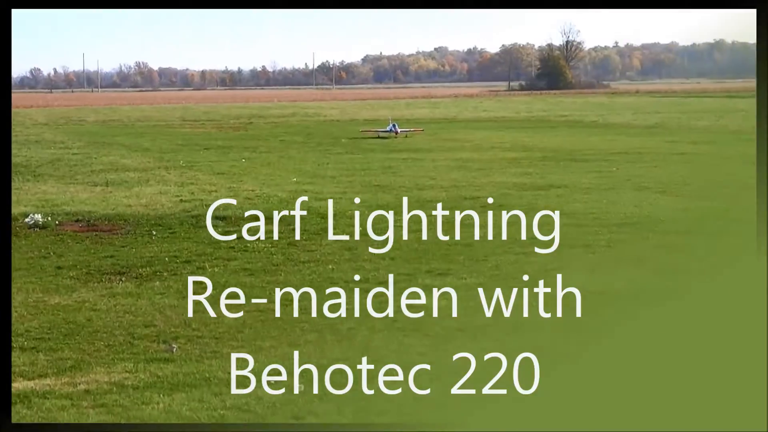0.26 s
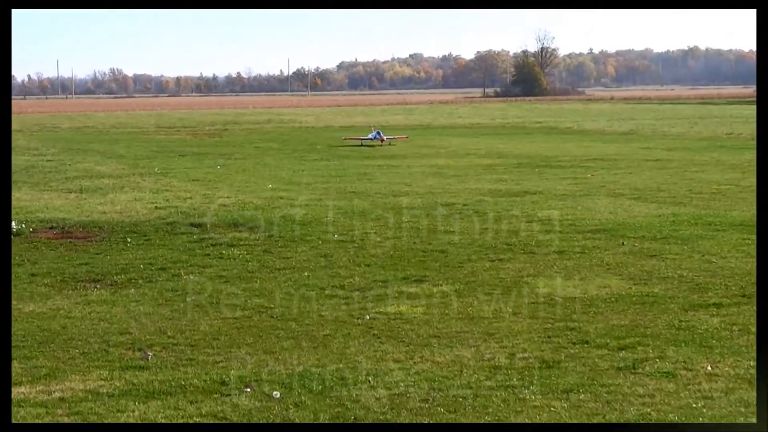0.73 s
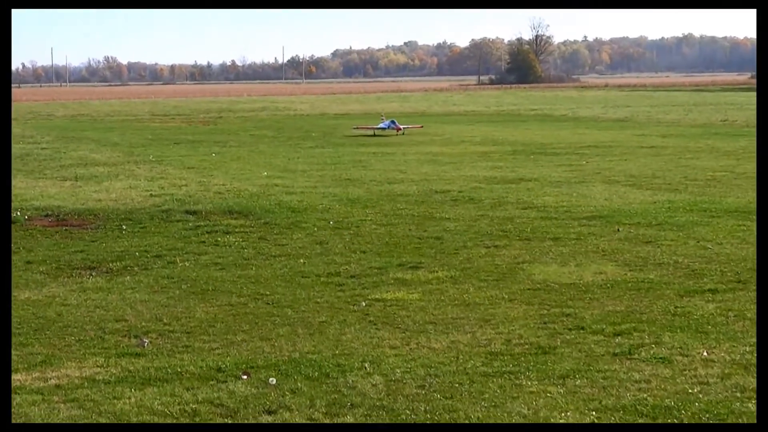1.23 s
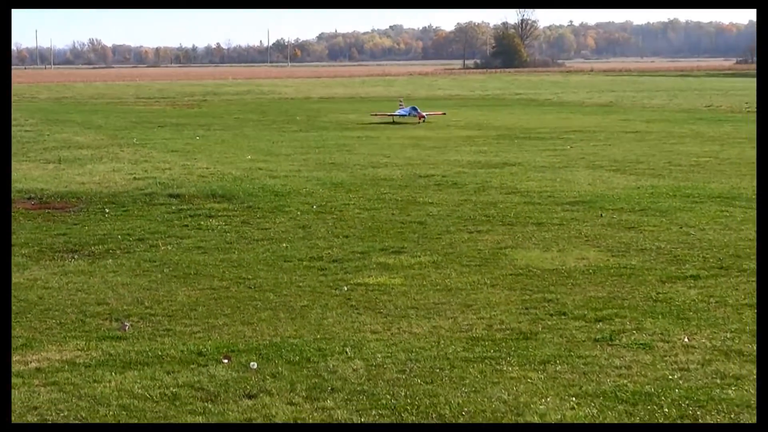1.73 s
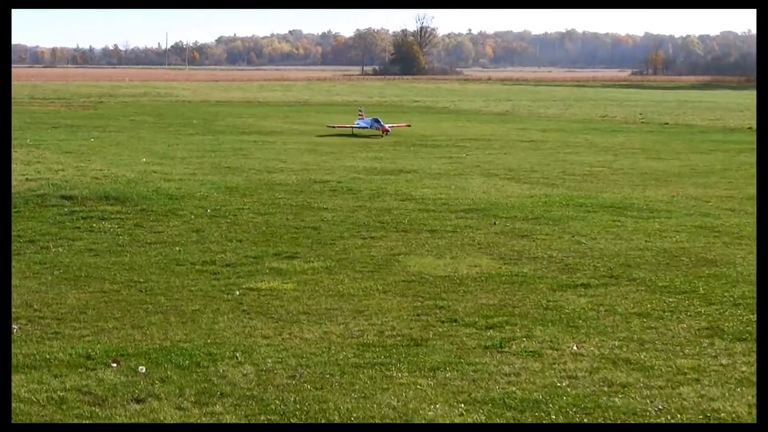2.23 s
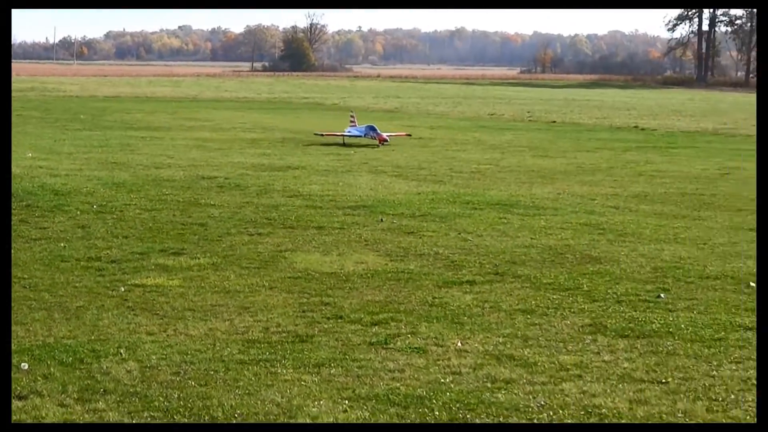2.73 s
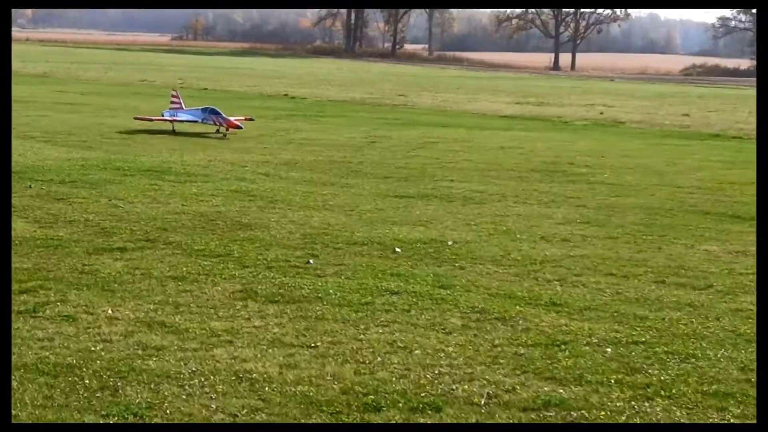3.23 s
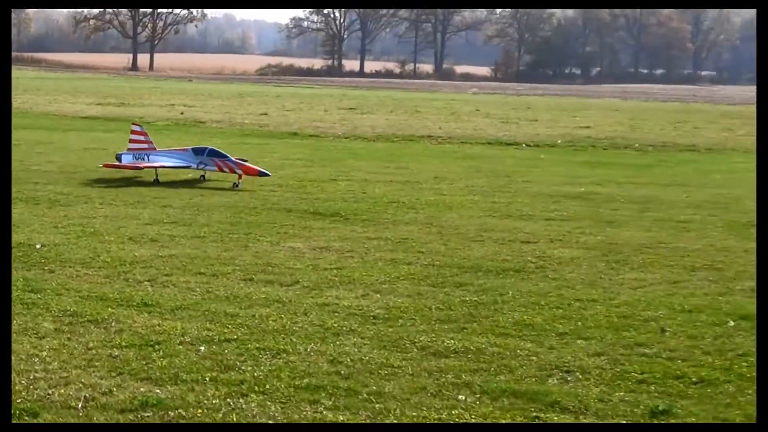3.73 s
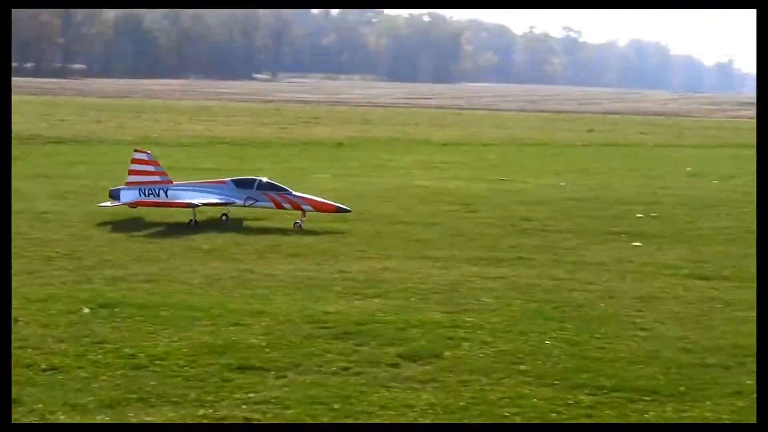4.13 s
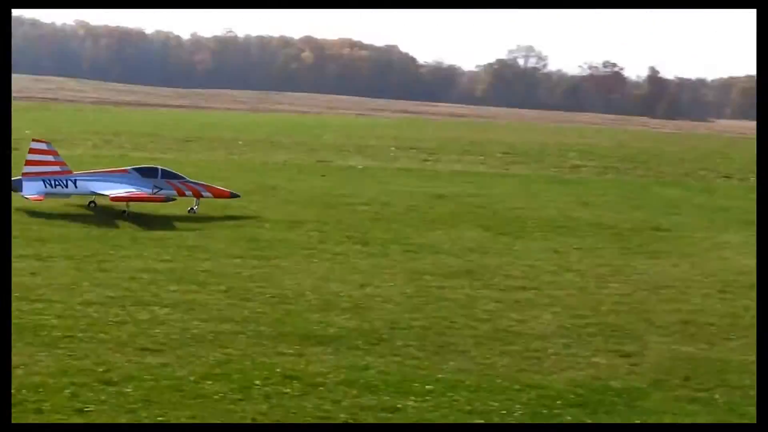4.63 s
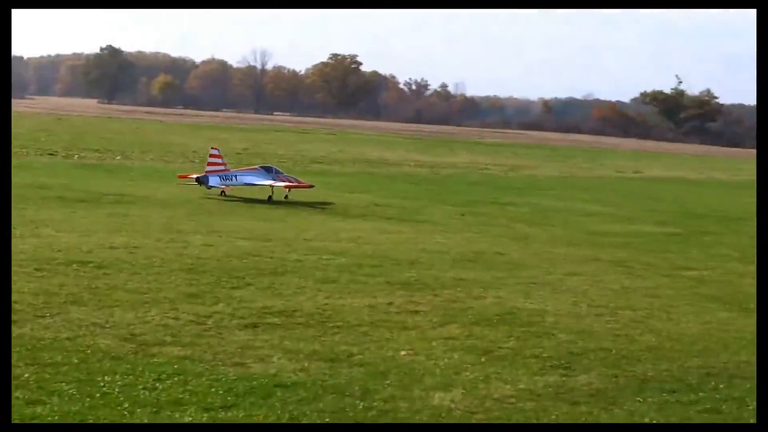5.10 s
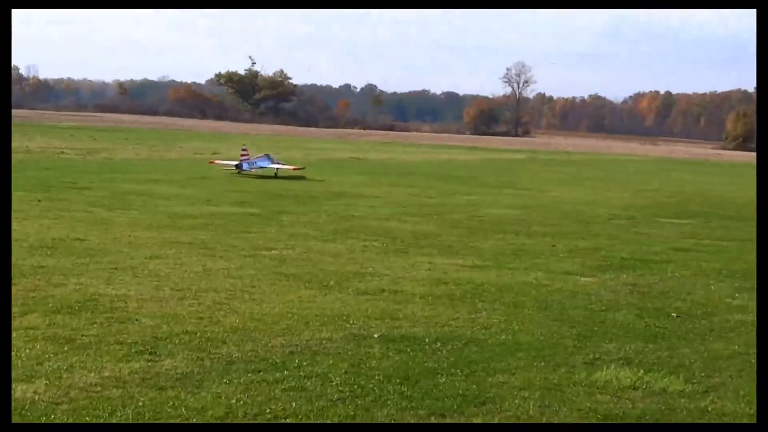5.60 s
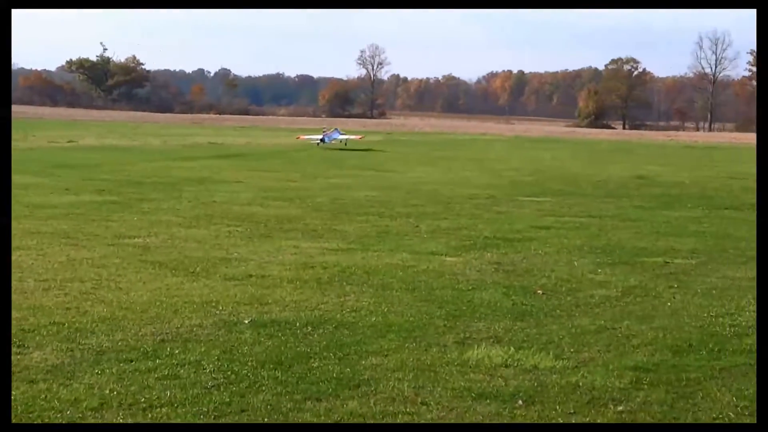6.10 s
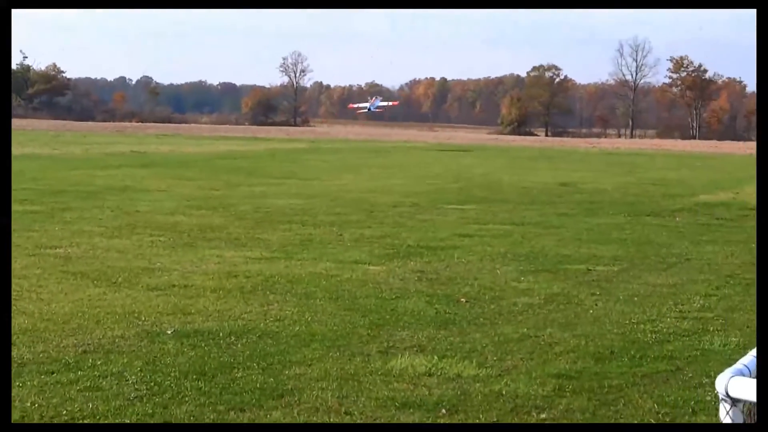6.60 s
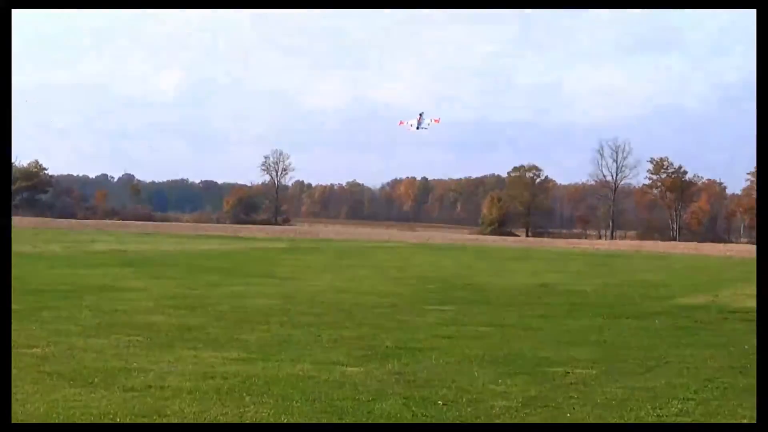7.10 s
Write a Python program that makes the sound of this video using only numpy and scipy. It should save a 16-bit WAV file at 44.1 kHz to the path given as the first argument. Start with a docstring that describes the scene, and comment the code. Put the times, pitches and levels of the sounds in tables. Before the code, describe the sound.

A handheld stereo camera in a breezy field hears a model jet's take-off. A thin piercing compressor tone rises over soft wind flutter, then airy rush builds and peaks as the jet passes at midpoint, wide and slightly left. The pitch sinks, the hiss fades and flickers, and a throaty low roar takes over behind the departing aircraft. Wind returns lightly, and a short steady whistle emerges last.

```python
"""A thin compressor whistle comes first, climbing in pitch as a model jet spools up, with wind puffs on the microphones.
The jet rolls past a camera on a grass field and lifts off: a blade tone and a noise skirt follow turbine speed and Doppler.
Directional bands of noise form the jet: a rush and a hiss of fine eddies, then a rumble, roar and blare behind it.
Delayed copies comb and ripple the exhaust sound, and moving air lifts and sinks its bands.
A brief whistle stands out near the end."""
import sys
import numpy as np
from scipy import signal
from scipy.fft import rfft, irfft, next_fast_len
from scipy.io import wavfile
from scipy.ndimage import uniform_filter1d, map_coordinates

SR = 44100
rng = np.random.default_rng(int(sys.argv[2]) if len(sys.argv) > 2 else 0)


def int16_out(signal):
    """Quantize to a 16-bit WAV file."""
    q = np.round(np.clip(np.atleast_2d(signal).T, -1, 1) * 32767)
    wavfile.write(sys.argv[1], SR, q.astype(np.int16))


N = 324244


def amp(db):
    """Logarithmic level: decibels to linear gain."""
    return 10 ** (np.asarray(db) / 20)


def unit(x):
    """Normalisation: scale to rms 1."""
    return x / np.sqrt(np.mean(x ** 2) + 1e-20)


def along(points, hz):
    """Logarithmic pitch: read (frequency, value) points on a log-frequency axis."""
    point_hz, value = np.transpose(points)
    return np.interp(np.log(hz + 1), np.log(point_hz + 1), value)


def curves(rows):
    """Linear interpolation: one value per sample for each column after the time."""
    s, *columns = np.transpose(rows)
    return [np.interp(np.arange(N) / SR, s, column) for column in columns]


def wobble(rate):
    """Random modulation: a smooth curve through random knots, rate knots a second."""
    knots = rng.standard_normal(int(N * rate / SR) + 4)
    return map_coordinates(knots, [np.arange(N) * rate / SR])


def bell(x, centre, width):
    """Gaussian weighting: 1 at the centre, 1/e one width away."""
    return np.exp(-((x - centre) / width) ** 2)


def filtered(x, response):
    """Linear filtering: multiply the spectrum of x by a response of frequency."""
    m = next_fast_len(N + SR // 4)
    return irfft(rfft(x, m) * response(np.fft.rfftfreq(m, 1 / SR)), m)[..., :N]


def noise(spectrum, width, patchy_db):
    """Turbulence noise: shaped stereo noise of rms 1 with drifting patches of random gain."""
    z = signal.stft(rng.standard_normal((2, N)), nperseg=512)[2]
    field = uniform_filter1d(rng.standard_normal(z.shape[1:]), size=7, axis=0)
    field = uniform_filter1d(field, size=16, axis=1)
    pair = signal.istft(z * amp(patchy_db * unit(field)), nperseg=512)[1][:, :N]

    def mid_side(hz):
        return amp(along(spectrum, hz)) * [np.ones_like(hz), amp(along(width, hz))]

    mid, side = filtered(pair, mid_side)
    return unit(np.array([mid + side, mid - side]))


# the take-off run: a straight line from rest, passing the camera at its closest
ACCEL_M_S2, CLOSEST_S, CLOSEST_M, SOUND_M_S = 6.61, 4.43, 22.3, 343


def flight():
    """Kinematics and Doppler effect: distance over the closest, angle from the nose [degrees], pitch factor."""
    t = np.arange(N) / SR
    past_m = ACCEL_M_S2 * (t ** 2 - CLOSEST_S ** 2) / 2
    distance_m = np.hypot(past_m, CLOSEST_M)
    receding = past_m / distance_m  # share of the speed that points away from the camera
    angle = np.degrees(np.arccos(-receding))
    doppler = 1 / (1 + ACCEL_M_S2 * t * receding / SOUND_M_S)
    return distance_m / CLOSEST_M, angle, doppler


# blade rates at which the parts have their idle and full-power levels
IDLE_HZ, FULL_HZ = 11600, 14300
LOSS_DB_PER_DOUBLING = 4  # of the distance
LIFT_OFF_S, CLIMB_S = 6.596, 0.21  # when the jet leaves the grass, and time scale of the change
# directivity of each part: (level at full power before beam and distance [dB], drop at idle [dB],
# beam angle from the nose [degrees], beam width [degrees], beam gain [dB], change once airborne [dB])
DIRECTIVITY = { "rumble": (-48.5, 10, 158.5, 31.5, 17, 1), "roar": (-39.5, 17.5, 145, 28, 14.5, 5.5),
               "blare": (-37.5, 11.5, 129, 10.5, 6, 20.5), "rush": (-27.5, 26, 13.5, 17, 5, -1),
               "hiss": (-37.5, 11.5, 85.5, 60.5, 13, -4), "intake": (-42.5, 23, 40, 54.5, 16.5, -27),
               "whine": (-43.5, 6, 13, 33, 7.5, -5)}


def heard_db(*parts):
    """Directivity and spreading loss: each part's level from throttle, beam, distance and lift-off."""
    distance, angle, _ = flight()
    blade_hz, = curves(BLADE_RATE)
    idling = (FULL_HZ - blade_hz) / (FULL_HZ - IDLE_HZ)
    airborne = (1 + np.tanh((np.arange(N) / SR - LIFT_OFF_S) / CLIMB_S / 2)) / 2
    loss_db = LOSS_DB_PER_DOUBLING * np.log2(distance)
    levels = []
    for part in parts:
        full_db, idle_db, aim, width, beam_db, air_db = DIRECTIVITY[part]
        throttle_db = full_db - idle_db * idling
        levels.append(throttle_db + beam_db * bell(angle, aim, width) + air_db * airborne - loss_db)
    return levels


def shimmer(x, closest_s, depth_db, size):
    """Scintillation: moving air lifts and sinks bands, more so the longer before or after the pass.

    A larger size makes each patch last longer.
    """
    hz, t, z = signal.stft(x, SR, nperseg=512)
    field = rng.standard_normal(z.shape[1:])
    for _ in range(2):
        field = uniform_filter1d(field, size=8, axis=0)
        field = uniform_filter1d(field, size=size, axis=1)
    far = np.abs(t - closest_s) / closest_s
    short_waves = hz / (hz + 1200)
    gain_db = depth_db * np.outer(short_waves, far) * unit(field)
    return signal.istft(z * amp(gain_db), nperseg=512)[1][:, :N]


# turbine speed, opened from idle: (time [s], blade rate before Doppler [Hz])
BLADE_RATE = [(0, 11716), (.55, 11580), (.85, 11622), (1.02, 11801), (1.35, 12677), (1.55, 13086),
              (1.78, 13473), (2.2, 13748), (2.7, 14020), (3.1, 14058), (3.5, 14203), (4.5, 14284),
              (5.8, 14552), (7.35, 14676)]
# noise around the blade tone: (offset from the tone [Hz], relative density [dB per Hz])
TONE_SKIRT = [(-4000, -13), (-2000, -11.5), (-1150, -5), (-650, -1), (-220, -3.5), (-70, 0), (0, 9),
              (70, -1), (250, -8), (800, -12), (2500, -28)]
# the fuselage shields the tone side-on: (angle from the nose [degrees], width [degrees], dip [dB])
FUSELAGE_SHADOW = (108, 33, 8)


def compressor():
    """Blade-passing tone: a thin scintillating tone inside a skirt of noise that follows its pitch."""
    blade_hz, = curves(BLADE_RATE)
    _, angle, doppler = flight()
    pitch_hz = blade_hz * doppler
    tone_db, intake_db = heard_db("whine", "intake")
    aim, width, dip_db = FUSELAGE_SHADOW
    tone_db = tone_db - dip_db * bell(angle, aim, width)
    blades = np.exp(2j * np.pi * np.cumsum(pitch_hz + 6 * wobble(70)) / SR)
    tone = amp(tone_db + 3.6 * wobble(30)) * unit(blades.real)
    # turbulence at the blades spreads the tone, mostly downwards
    m = next_fast_len(N)
    offset_hz, density_db = np.transpose(TONE_SKIRT)
    shape = amp(np.interp(np.fft.fftfreq(m, 1 / SR), offset_hz, density_db, left=-np.inf, right=-np.inf))
    spread = np.fft.ifft(shape * (rng.standard_normal(m) + 1j * rng.standard_normal(m)))[:N]
    skirt_db = intake_db + 2.4 * wobble(24) + 1.5 * wobble(110)
    skirt = amp(skirt_db) * unit((spread * blades).real)
    return tone + shimmer(skirt[None], closest_s=CLOSEST_S, depth_db=5, size=9)


# wind on the microphones between the puffs: (time [s], mean level [dB])
WIND_LEVEL = [(0, -67), (.6, -57), (1.35, -46.5), (1.75, -46.5), (2.02, -43.5), (2.14, -40.5), (2.33, -37),
              (2.95, -43), (3.1, -42), (3.27, -36), (3.68, -54), (3.88, -42), (4.1, -114), (6.15, -57),
              (6.42, -44), (6.78, -43.5), (6.92, -41), (7.35, -45)]
# puffs of wind: (time [s], peak level before the high-pass [dB], rise [s], fall [s], low edge [Hz])
WIND_PUFFS = [(.075, -52, 0.013, 0.013, 25), (.203, -32.5, 0.026, .049, 150), (.272, -37.5, .027, .03, 160),
              (.39, -52, .012, .02, 60), (1.122, -42, .015, .014, 50), (1.472, -28.5, 0.029, 0.011, 150),
              (1.54, -40, .012, .012, 25), (1.575, -27, .02, 0.026, 60), (1.853, -30.5, 0.0042, .032, 100),
              (2.25, -31, .008, 0.0063, 180), (2.288, -30, 0.0076, 0.0077, 50),
              (2.341, -27, 0.0069, 0.01, 150), (2.484, -29.5, 0.016, 0.028, 40),
              (2.733, -27.5, 0.022, 0.034, 130), (3.045, -28, 0.0044, 0.013, 80),
              (3.193, -29, 0.035, 0.04, 60), (3.31, -34.5, 0.016, 0.028, 80),
              (3.555, -35, 0.076, 0.032, 130)]
# wind noise spectrum: (frequency [Hz], relative density [dB per Hz])
WIND_SPECTRUM = [(15, -32), (40, -13), (80, -5), (160, 1), (320, -2), (540, -11.5), (900, -23), (2000, -51)]
# difference between the two microphones: (frequency [Hz], side level against the middle [dB])
WIND_WIDTH = [(40, -15), (100, -9.5), (220, -5.5), (600, 0.5)]


def wind():
    """Turbulent pressure on the ports: a low flutter with short puffs; smaller eddies have less bass."""
    t = np.arange(N) / SR
    breeze_db, = curves(WIND_LEVEL)
    out = amp(breeze_db + 2.5 * wobble(22.05)) * noise(WIND_SPECTRUM, WIND_WIDTH, patchy_db=0.5)
    buffet = noise(WIND_SPECTRUM, WIND_WIDTH, patchy_db=0.1)
    for s, db, rise, fall, low_hz in WIND_PUFFS:
        side_s = np.where(t < s, rise, fall)
        envelope = amp(db) / (1 + ((t - s) / side_s) ** 2) ** 2
        high_pass = signal.butter(2, low_hz, "highpass", fs=SR, output="sos")
        out = out + envelope * signal.sosfilt(high_pass, buffet)
    return out


# fine-eddy spectra: (frequency [Hz], relative density [dB per Hz])
RUSH_SPECTRUM = [(300, -63), (1200, -9.5), (1900, -7), (2350, -2), (3000, 1.2), (3700, 0.4), (4600, -6),
                 (5350, -3.5), (6500, -8.5), (7600, -13.5), (14000, -39)]
HISS_SPECTRUM = [(600, -51), (2500, -10.5), (4500, -3), (6000, -3), (8300, 0), (10500, -1.5), (12500, -4),
                 (14500, -8.5), (16000, -24)]
# difference between the two microphones: (frequency [Hz], side level against the middle [dB])
EXHAUST_WIDTH = [(1500, -85), (2500, -78), (3600, -10.5), (5000, -14.5), (8500, -25.5), (11000, -5),
                 (13000, -66)]
# flutter strongest just after the pass: (angle from the nose [degrees], width [degrees],
# extra depth before each band's share [dB])
AFT_FLUTTER = (130, 30, 1.2)


def exhaust():
    """Small-scale mixing noise: fine eddies rush and hiss; moving air flickers the shortest waves most."""
    rush_db, hiss_db = heard_db("rush", "hiss")
    distance, angle, _ = flight()
    aim, width, depth_db = AFT_FLUTTER
    flutter_db = depth_db * bell(angle, aim, width)
    flicker = 1.18 * np.log2(distance) * wobble(14) + 1.1 * wobble(30) + (1.02 + flutter_db) * wobble(70)
    rush = amp(rush_db + 0.48 * flicker) * noise(RUSH_SPECTRUM, EXHAUST_WIDTH, patchy_db=1.5)
    hiss = amp(hiss_db + 0.89 * flicker) * noise(HISS_SPECTRUM, EXHAUST_WIDTH, patchy_db=1.5)
    return rush + hiss


# lean of the exhaust at the closest point: (frequency [Hz], left minus right for a central sound [dB])
LEFT_LEAN = [(2400, 0), (4400, 1.6), (8100, .7), (13000, 0)]
NARROWING = 2.8  # the width shrinks with this power of the distance


def widen(x):
    """Apparent source width: a point while far away, the exhaust spreads out and leans left close by."""
    distance, _, _ = flight()
    mid, side = (x[0] + x[1]) / 2, (x[0] - x[1]) / 2
    lean = filtered(mid, lambda hz: 1 - 2 / (1 + amp(along(LEFT_LEAN, hz))))
    side = (side + lean) / distance ** NARROWING
    return np.array([mid + side, mid - side])


# large-eddy spectra: (frequency [Hz], relative density [dB per Hz])
RUMBLE_SPECTRUM = [(30, -52), (70, -27), (110, -16), (170, -3.5), (250, 3.5), (350, -1.5), (450, -6),
                   (700, -46), (2000, -70)]
ROAR_SPECTRUM = [(100, -45), (220, -23.5), (310, -9), (420, -8), (520, 1.5), (620, 2.5), (740, -0.5),
                 (880, -12), (1050, -12.5), (1300, -19), (4000, -79)]
BLARE_SPECTRUM = [(200, -31), (800, -2), (1000, 4), (1350, -0.5), (1800, 0), (2100, -3.5), (2700, 0),
                  (8000, -33.5)]
# difference between the two microphones: (frequency [Hz], side level against the middle [dB])
PLUME_WIDTH = [(100, -16), (280, -28), (600, -37.5), (1500, -46.5), (4000, -23.5)]


def plume():
    """Large-scale mixing noise: big eddies throb, loudest once the nozzle points at the listener."""
    rumble_db, roar_db, blare_db = heard_db("rumble", "roar", "blare")
    throb = wobble(25)
    rumble = amp(rumble_db + 0.25 * throb) * noise(RUMBLE_SPECTRUM, PLUME_WIDTH, patchy_db=1.2)
    roar = amp(roar_db + 0.7 * throb) * noise(ROAR_SPECTRUM, PLUME_WIDTH, patchy_db=1.8)
    blare = amp(blare_db + 0.8 * throb) * noise(BLARE_SPECTRUM, PLUME_WIDTH, patchy_db=1.25)
    return rumble + roar + blare


# echoes from small things around the camera, weakest near the pass: (time [s], gain [dB])
CLUTTER_GAIN = [(0, -8), (2.1, -10), (3.3, -16), (4.4, -20), (5.6, -18), (6.3, -15), (7.35, -13)]


def scatter(x, life_ms, count):
    """Scattering: faint echoes from small things ripple the treble, fading through count patterns in turn."""
    ms = np.arange(SR // 50) * 1000 / SR
    treble = filtered(x, lambda hz: hz ** 2 / (hz ** 2 + 900 ** 2))
    place = np.linspace(0, count - 1, N)
    heard = np.zeros_like(x)
    for k in range(count):
        echoes = rng.standard_normal(len(ms)) * np.exp(-ms / life_ms) * (ms > 1)
        echoes = echoes[None] / np.linalg.norm(echoes)
        near = np.abs(place - k) < 1
        fade = np.cos(np.pi / 2 * (place[near] - k))
        heard[:, near] += fade * signal.fftconvolve(treble[:, near], echoes, axes=1)[:, :len(fade)]
    gain_db, = curves(CLUTTER_GAIN)
    return x + amp(gain_db) * heard


# reflection off something close to the camera: (time [s], delay [ms], strength before band limits [0-1])
NEARBY_PATH = [(0, 1.42, 0.4), (1.3, 1.43, 0.17), (2.7, 1.7, 0.02), (3.1, 1.4, 0.04), (4.3, 1.17, 0.09),
               (5.2, 1.15, 0), (7.35, 1.54, 0.23)]
# reflection off the grass: (time [s], delay [ms], strength before band limits [0-1])
GROUND_PATH = [(2.1, .15, 0), (2.4, .165, .1), (2.62, .18, .15), (2.73, .235, .28), (2.81, .29, .42),
               (2.95, .4, .15), (3.1, .55, 0), (5.4, .85, 0), (5.75, .8, .15), (5.9, .66, .22),
               (6.0, .51, .2), (6.07, .43, .36), (6.15, .38, .3), (6.21, .32, .5), (6.27, .245, .6),
               (6.35, .195, .65), (6.4, .16, .5), (6.48, .11, .1), (6.8, .1, 0), (6.95, .19, .4),
               (7.03, .235, .7), (7.1, .283, .85), (7.22, .32, .65), (7.35, .37, .5)]


def reflect(x, path, low_hz, high_hz, inverted=False):
    """Two-path interference: a band-limited copy whose delay moves makes a sweeping comb."""
    delay_ms, strength = curves(path)
    read_at = np.arange(N) - delay_ms * SR / 1000
    band = filtered(x, lambda hz: hz ** 2 / (hz ** 2 + low_hz ** 2) / np.sqrt(1 + (hz / high_hz) ** 2))
    copy = strength * np.array([map_coordinates(channel, [read_at]) for channel in band])
    return (x - copy if inverted else x + copy) / np.sqrt(1 + strength ** 2)


# swells and fades in the air: (time [s], half length [s], gain [dB], centre [Hz], half width [octaves])
AIR_SWELLS = [ (0, 0.41, -10, 2960, 5.1), (0.154, 0.07, 10.5, 12000, 2.7), (0.275, 0.078, 11, 5400, 0.22),
              (0.805, 0.29, 2, 7500, 0.35), (1.05, 0.11, 10, 3340, 0.35), (1.1, .4, 6, 1290, 0.3),
              (1.2, 0.42, 3.5, 4130, 13), (1.293, 0.16, 7, 5450, 0.31), (1.64, 0.13, -5.5, 4860, 2),
              (1.927, 0.36, 3.5, 1820, 0.21), (2.0, 0.17, 5, 5460, 0.42), (1.9, .14, -3, 3160, 0.18),
              (2.45, 0.16, -1.5, 8500, 1.3), (2.35, 0.28, 2, 3000, 0.11), (2.206, 0.037, 9, 14300, .08),
              (2.204, 0.029, 2.5, 14000, 3.7), (2.5, 0.31, 5.5, 1680, 1.35), (2.77, .05, 6.5, 1900, .5),
              (2.603, 0.21, -9, 14400, 0.23), (2.844, 0.04, -6, 3160, 1.4), (2.894, 0.43, 6.5, 11900, 0.96),
              (3.53, 0.18, -9.5, 790, 0.77), (3.585, 0.053, -7, 2700, 1.04), (3.695, 0.16, 4.5, 2540, 1.9),
              (4.153, 0.47, 8, 740, 0.17), (4.35, 0.1, 2.5, 373, 0.73), (4.353, 0.23, -8.5, 10000, 0.32),
              (4.67, 0.18, -5, 550, 1.8), (4.776, 0.044, -6.5, 11000, 0.5), (4.827, 0.068, 4.5, 500, 1.9),
              (4.853, 0.53, 3.5, 14700, 1.4), (5.033, .16, 2.5, 328, 1.3), (5.093, 0.035, -5.5, 8800, 2),
              (5.21, 0.025, 4.5, 12000, 1.2), (5.327, 0.074, -9, 9830, 2), (5.539, 0.044, 8.5, 10700, 1.1),
              (5.595, 0.04, -4, 6950, 1.9), (5.652, 0.25, -2.5, 910, 0.48), (5.43, 0.046, 4.5, 2840, 0.37),
              (5.72, 0.098, 4, 2710, 0.44), (5.715, 0.062, 10.5, 7060, 1.2), (5.825, 0.044, -1, 5440, 1.2),
              (6.027, 0.36, -18.5, 6100, 2.18), (6.107, .06, -5, 12000, 0.97), (6.16, 0.45, 4, 429, 0.77),
              (6.24, 0.17, -7.5, 1540, 0.28), (6.31, 0.054, 4, 3420, .5), (6.375, 0.03, 7, 12500, 0.68),
              (6.495, 0.11, -4.5, 2800, 0.32), (6.55, 0.18, -3, 11000, 5.2), (6.6, .4, -3, 12600, 0.26),
              (6.715, 0.16, -7.5, 301.4, 1.24), (6.793, 0.03, 6.5, 5000, 1.4),
              (6.91, 0.099, 3.5, 2940, 1.8), (7.14, 0.082, -4.5, 2700, 0.96), (7.35, 0.068, 6, 2870, 0.32),
              (7.25, 0.24, -9, 14200, .22), (7.35, 0.44, 11, 655, 0.9)]


def swell(x):
    """Propagation through air: broad bands swell and fade, each a smooth hump in time and in pitch."""
    hz, t, z = signal.stft(x, SR, nperseg=512)
    gain_db = 0
    for s, length, db, centre, octaves in AIR_SWELLS:
        pitch_hump = bell(np.log2((hz + 1) / centre), 0, octaves)
        gain_db = gain_db + db * np.outer(pitch_hump, bell(t, s, length))
    return signal.istft(z * amp(gain_db), nperseg=512)[1][:, :N]


# the brief whistle: (start [s], attack [s], pitch [Hz], peak level [dB])
BRIEF_WHISTLE = (7.295, .02, 1705, -23)


def whistle():
    """Frequency-modulated sine: a slightly unsteady whistle stands out of the roar as the jet climbs."""
    t = np.arange(N) / SR
    start_s, attack_s, hz, db = BRIEF_WHISTLE
    attack = np.clip((t - start_s) / attack_s, 0, 1)
    return amp(db) * attack * np.sin(2 * np.pi * np.cumsum(hz + 7 * wobble(80)) / SR)


def scene():
    """Superposition: at a grazing angle the ground returns the jet's shorter waves upside down."""
    jet = widen(exhaust()) + plume()
    jet = reflect(jet, GROUND_PATH, low_hz=450, high_hz=6000, inverted=True)
    jet = reflect(jet, NEARBY_PATH, low_hz=80, high_hz=2000)
    jet = shimmer(jet, closest_s=CLOSEST_S, depth_db=2.2, size=30)
    jet = scatter(jet, life_ms=1.5, count=16)
    return swell(jet + compressor()) + whistle() + wind()


# the camera's treble roll-off: (frequency [Hz], gain [dB])
TREBLE_ROLL_OFF = [(14950, 0), (15250, -10), (15700, -16)]
TOP_HZ = 15750


def record(dry):
    """Band limiting: the camera rolls off the treble and keeps nothing from its band limit up."""
    return filtered(dry, lambda hz: amp(along(TREBLE_ROLL_OFF, hz)) * (hz < TOP_HZ))


dry = scene()
out = record(dry)
int16_out(out)
```